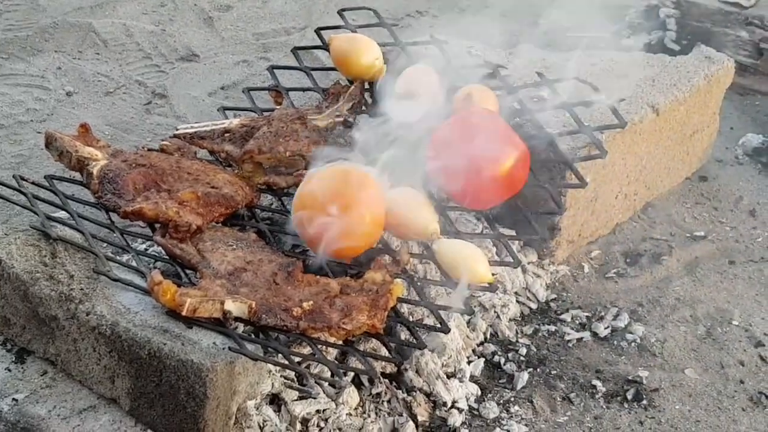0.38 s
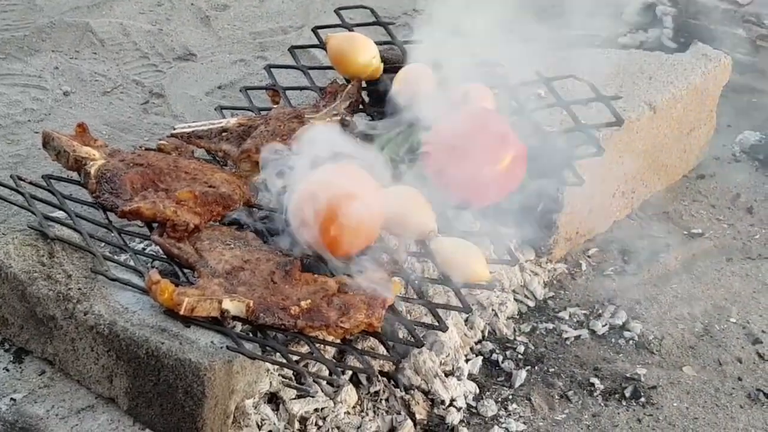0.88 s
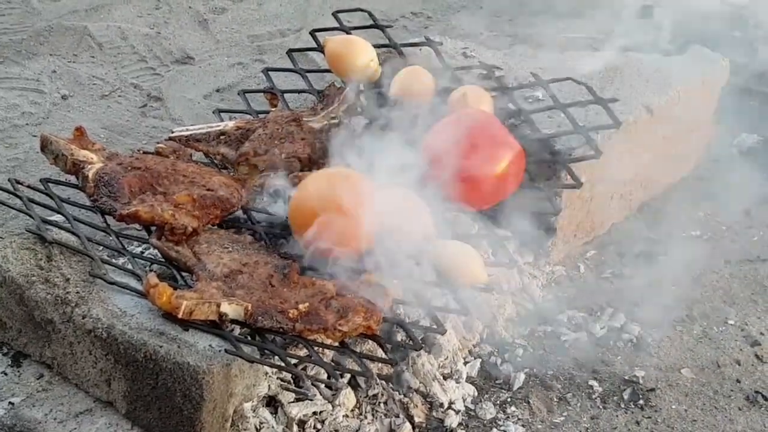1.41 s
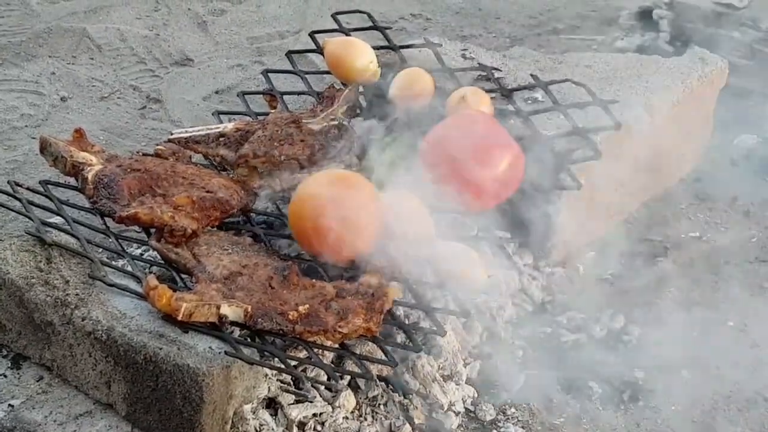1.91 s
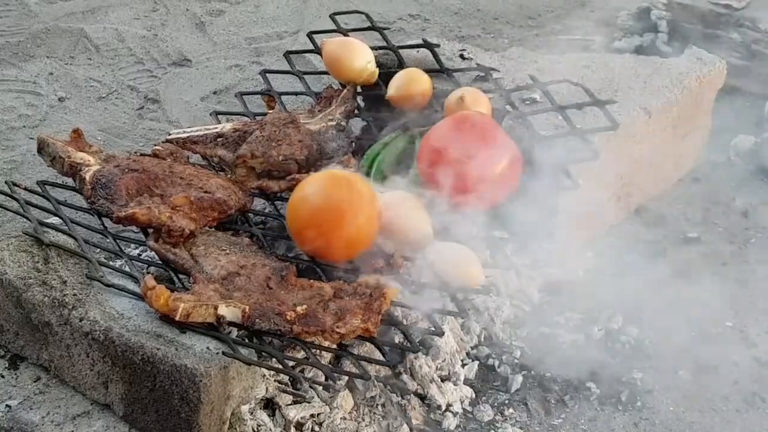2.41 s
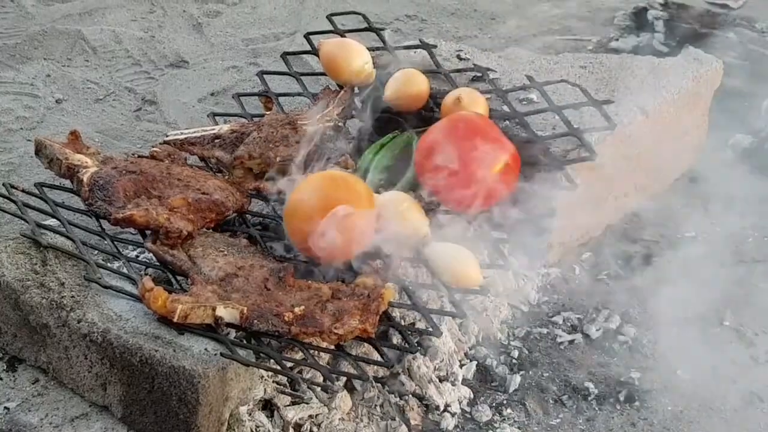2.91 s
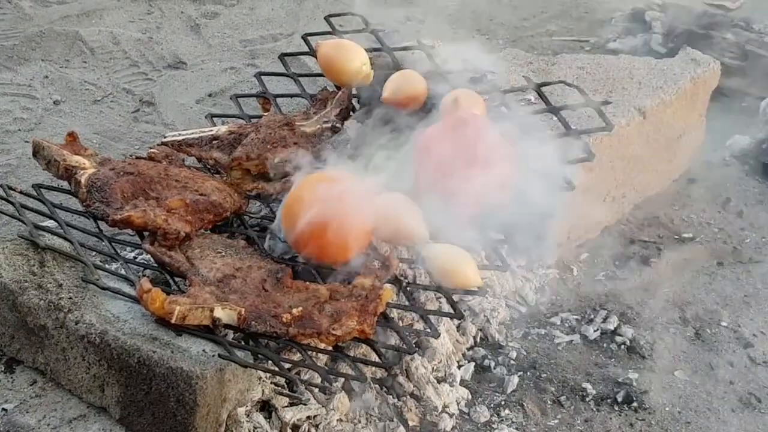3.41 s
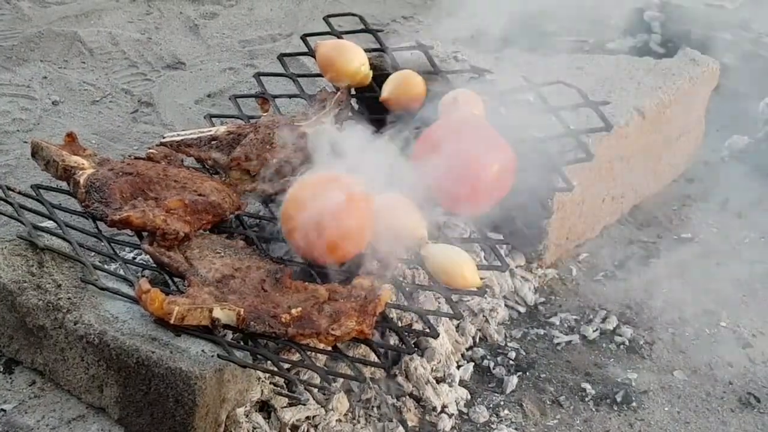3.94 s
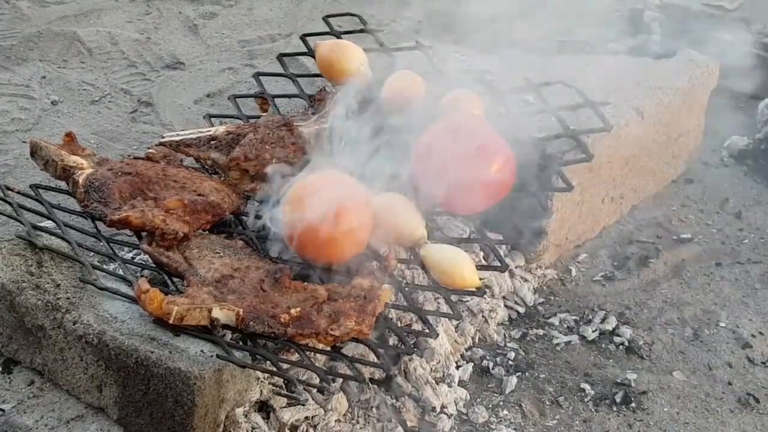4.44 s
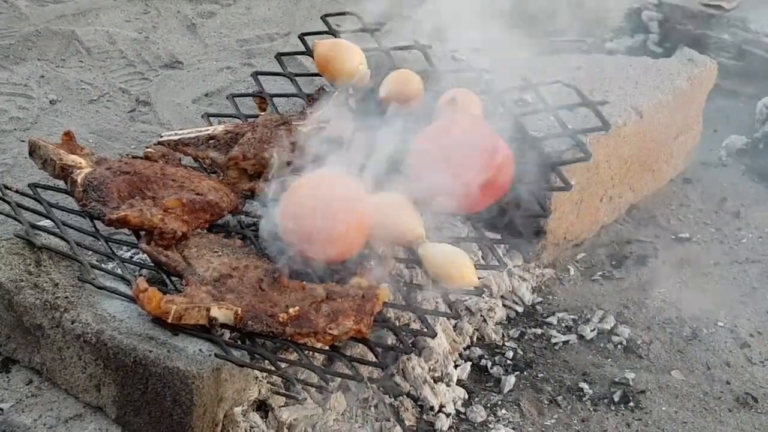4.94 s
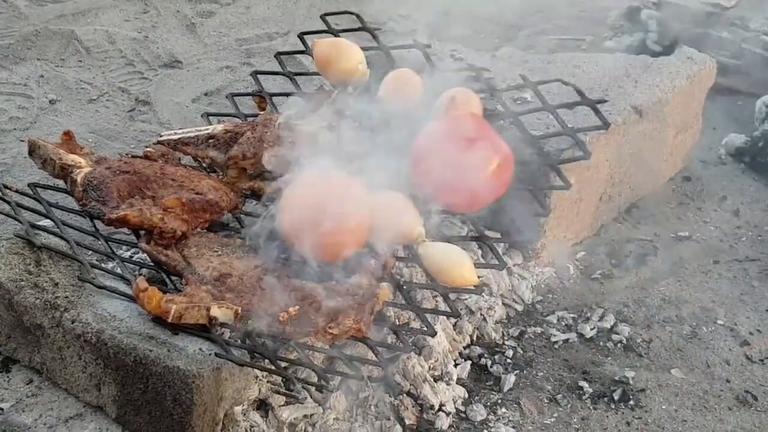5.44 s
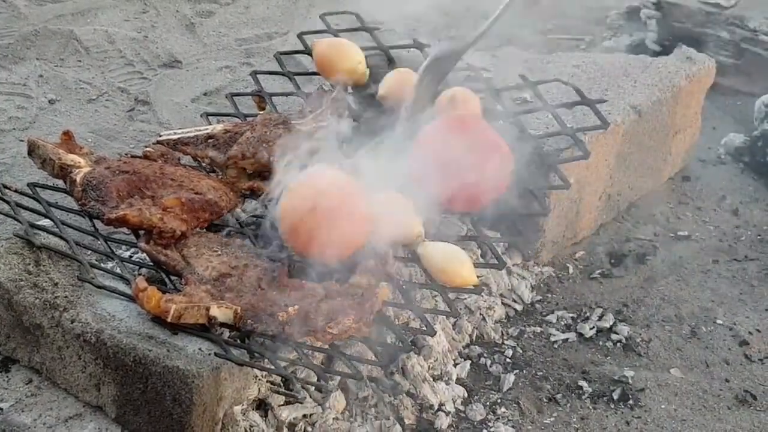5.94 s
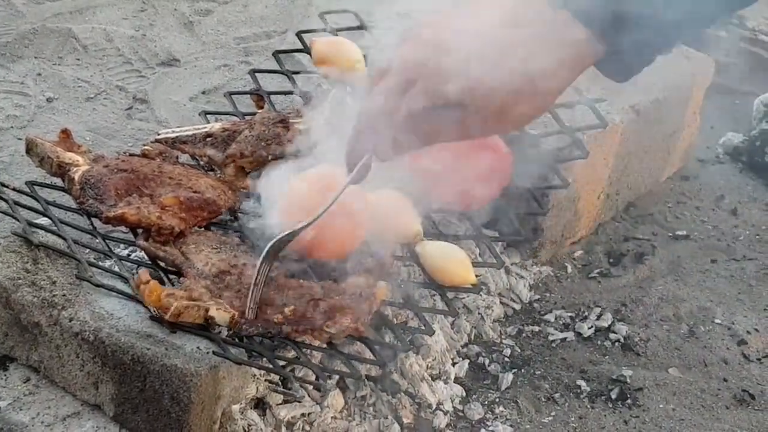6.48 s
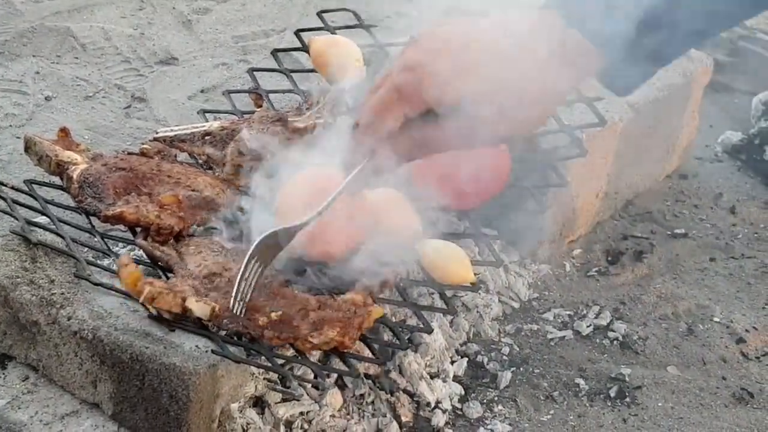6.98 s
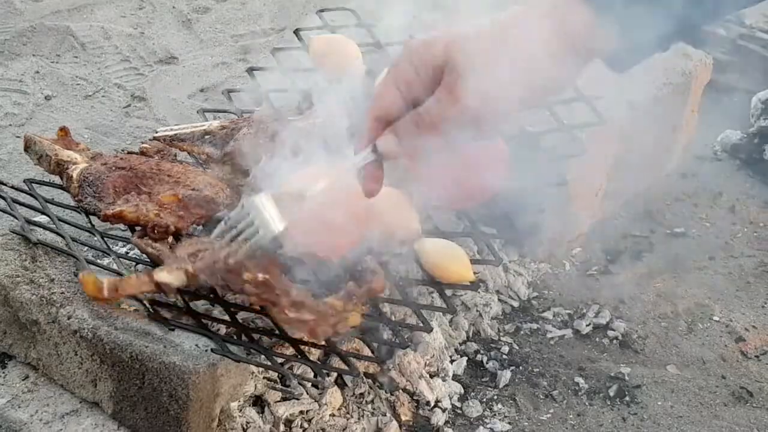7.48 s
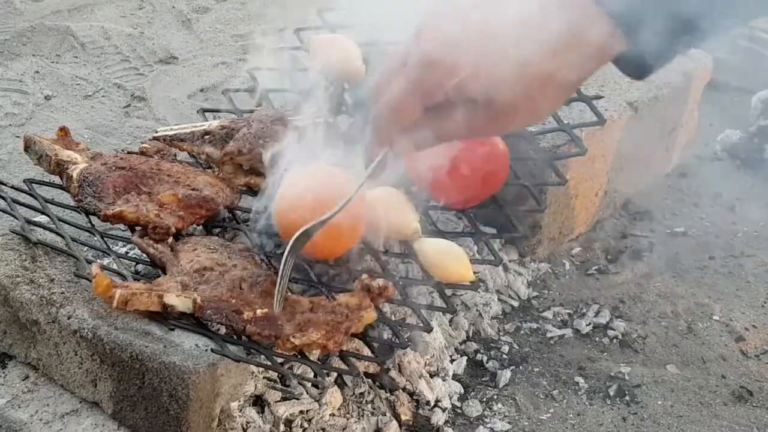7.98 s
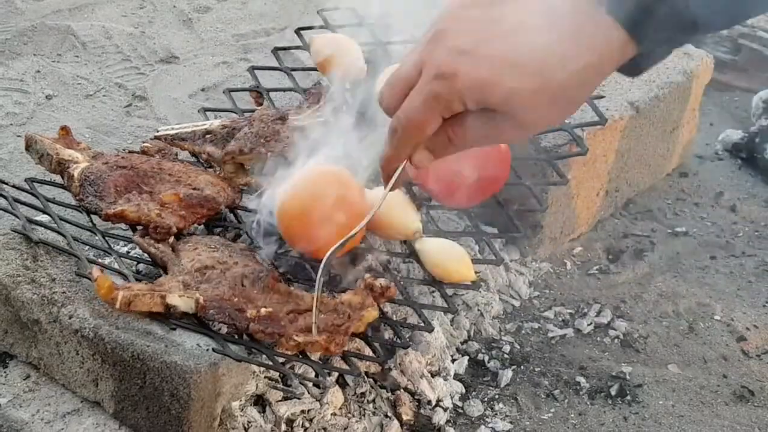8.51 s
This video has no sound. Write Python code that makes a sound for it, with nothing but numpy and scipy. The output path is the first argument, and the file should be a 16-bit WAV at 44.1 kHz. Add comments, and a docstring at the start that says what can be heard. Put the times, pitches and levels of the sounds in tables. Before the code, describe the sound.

Close outdoor stereo of meat sizzling on a wire grill, with fine hiss and sharp fat spits, strongest in the first three seconds. A soft knock comes near 2.6 seconds, then gritty scuffs from the right. Distant heavy engines pull and change gear over traffic rumble and light wind. The right side loses treble after three seconds, then becomes muffled under a finger.

```python
"""Meat sizzles and spits on a wire grill over coals: flickering grainy noise and short band-levelled snaps. A
hand-held two-port microphone is close by, outdoors; grains and damped modes make scuffs on grit and a knock. On
a distant road two heavy engines, built from unsteady tones, accelerate over layered traffic noise and wind.
After three seconds a finger comes over the right port: first a deep notch opens around 8 kHz, then a growing
muffling."""
import sys
import numpy as np
from scipy import signal
from scipy.fft import rfft, irfft, next_fast_len
from scipy.io import wavfile
from scipy.ndimage import uniform_filter1d, map_coordinates

SR = 44100
rng = np.random.default_rng(int(sys.argv[2]) if len(sys.argv) > 2 else 0)


def attenuation_scalar(level_db):
    """Turn a level in dB into a linear amplitude multiplier (20 dB per decade)."""
    decades = np.asarray(level_db, float) / 20
    return 10 ** decades


def file_out(sig):
    """Save sig as 16-bit WAV at sys.argv[1]."""
    # one column per channel
    cols = np.atleast_2d(sig).T
    # limit, then scale
    lim = np.clip(cols, -1, 1)
    pcm = np.round(lim * 32767).astype(np.int16)
    wavfile.write(sys.argv[1], SR, pcm)


N = 380141  # samples

# swell of the sizzle: time_s, level_db
SIZZLE_SWELL = [(0, -56), (1, -57), (2.2, -58), (2.5, -54.5), (2.9, -55.5), (3.2, -58.5), (3.6, -59),
                (4.3, -62), (6, -62), (8.62, -63.5)]
# colour of the sizzle at each port, combed by the stones: freq_hz, left_db, right_db
FAT_COLOUR = [(1500, -16, -35), (2640, -10.5, -15), (3735, 3.5, 4.5), (4380, 2.5, -3), (5440, -4.5, 0),
              (7330, 3.5, 4), (8800, 0, -0.5), (9500, 3, -10), (11000, 3.5, 5), (12700, 2, 2),
              (15500, -3, 2)]
# left-right likeness of the sizzle: freq_hz, likeness (0 to 1)
FAT_LIKENESS = [(3000, 0.44), (4000, 0.47), (7000, 0.41), (9000, 0.04), (14000, 0.026)]
# colour of the steady fine hiss: freq_hz, level_db
HISS_COLOUR = [(1200, -34), (2200, -22), (3500, -23), (4600, 3), (9000, 2.5), (10000, 0), (14000, 4)]
# the loudest spits: start_s, middle_db, top_db, body_db, left_over_right_db
LOUD_SPITS = [(0.0597, -41.5, -44, -56, -1), (0.5867, -46, -50, -65, -4), (0.9676, -44.5, -46.5, -66, 2),
              (1.1506, -50, -47, -63, -1), (1.179, -55, -49, -71, -2), (1.4317, -64, -47.5, -60, -8),
              (1.6813, -46, -46, -72, -1), (1.7183, -49, -47, -53.5, -3), (1.8842, -62, -51, -71, -3),
              (1.9252, -51, -46, -65, -2), (2.103, -57, -54, -76, -5), (2.1325, -60, -51, -76, -9),
              (2.3259, -60, -46.5, -72, -7), (2.4228, -42, -36.5, -65, 3), (2.4663, -52, -64, -74, 1),
              (2.4876, -62, -47, -71, -3), (2.5392, -59, -46, -68, 2), (2.638, -46.5, -46, -55, -6),
              (2.683, -47.5, -55, -55, -3), (2.992, -49, -47, -75, -3), (3.0983, -43.5, -43, -68, -18),
              (3.2122, -41.5, -42, -50, -20), (3.3917, -48, -59, -61, -5), (3.4441, -47, -46, -64, 4),
              (3.512, -50, -48, -71, -2), (3.654, -71, -68, -50.5, 6), (3.8271, -73, -68, -54.5, -2),
              (3.9046, -50.5, -63, -67, 0), (4.1698, -71, -52, -69, 0), (4.8485, -50, -50, -53, -2),
              (4.884, -56, -50, -74, 0), (5.295, -52, -69, -64, -3), (7.2874, -52, -50, -56.5, 4),
              (7.55, -48.5, -59, -52.5, 7), (7.8208, -49, -43, -69, 5), (8.5472, -62, -47, -80, 0)]
# scuffs on grit, rise and fall spanning 20 dB: peak_s, rise_s, fall_s, crunch_db, hollow_db, bright_db
SCUFF_SWELLS = [(1.925, 0.037, .15, -60.5, -58, -65), (3.259, 0.0045, 0.046, -62, -42, -61),
                (3.281, 0.023, 0.034, -46, -42.5, -47.5), (3.305, .03, 0.2, -54.5, -68, -57),
                (3.946, 0.094, 0.054, -57, -65, -62), (4.045, 0.076, 0.14, -51, -62, -51),
                (4.516, 0.025, 0.017, -52, -54, -59), (4.545, 0.015, 0.079, -52, -51.5, -65),
                (4.7, 0.18, 0.11, -58.5, -69, -78), (5.4327, 0.0047, 0.0062, -40.5, -52, -68),
                (5.476, 0.14, 0.2, -53.5, -64, -65.5), (5.77, 0.019, 0.042, -55, -64, -76)]
# colour of coarse grit: freq_hz, level_db
COARSE_GRIT = [(800, -25), (1300, 5.5), (2000, -0.5), (2700, -8.5), (3600, -22)]
# colour of fine grit: freq_hz, level_db
FINE_GRIT = [(2000, -14), (2900, -10), (4500, -12), (6500, -30), (9000, -31)]
# hollow resonances of the sole: freq_hz, width_hz, level_db
SOLE_MODES = [(428, 210, -17), (677, 120, 4.5), (1020, 150, 0), (1320.5, 520, -9)]
# modes of the knocked solid thing: freq_hz, level_db, t60_s
KNOCK_MODES = [(277, 3.5, 0.042), (338, -2.5, .04), (535, -6, 0.032), (750, -7.5, 0.034),
               (976, -1.5, 0.026), (1470, -17, 0.023), (2110, -29, .02)]
# nearer engine, pulling, lifting off, pulling in the next gear: time_s, firing_hz, fundamental_db, second_db
NEAR_ENGINE = [(0, 73.15, -43, -47.5), (0.35, 72.9, -40, -46), (1.03, 73.3, -43, -47),
               (1.86, 74.67, -40, -47), (2.32, 74.5, -42, -45.5), (2.67, 74.8, -43, -51.5),
               (3.06, 75.17, -43, -48), (3.78, 74.74, -38.5, -47.5), (4.3, 76.03, -40, -45.5),
               (4.55, 77.2, -34, -45), (4.9, 76.4, -36, -43), (5.12, 77.47, -32.5, -41.5),
               (6.23, 80.1, -36.5, -43), (6.45, 79.45, -36, -41.5), (7.11, 80.5, -38, -40.5),
               (7.56, 80.35, -41, -47.5), (7.76, 78, -47.5, -64), (7.95, 76.7, -53, -70),
               (8.15, 69, -52, -66), (8.3, 64, -61, -55), (8.38, 64.9, -38.5, -70), (8.48, 67.2, -45, -73),
               (8.62, 69.3, -38, -48)]
# farther engine through two gears: time_s, firing_hz, level_db, gear_whine_db
FAR_ENGINE = [(0, 42.8, -68, -85), (1.15, 45.23, -53, -66), (2, 50.12, -61, -65.5), (2.8, 55.02, -54, -57),
              (3.6, 58.5, -56, -64), (4.2, 60.36, -66, -63), (4.45, 58.1, -64, -88), (4.8, 48.98, -53, -90),
              (5.5, 48.64, -45, -90), (6.2, 50.1, -44.5, -78), (6.9, 52.45, -48, -67),
              (7.4, 55.16, -45, -68.5), (7.8, 56.96, -44.5, -68.5), (8.2, 59.4, -47.5, -79),
              (8.62, 61.52, -58, -66)]
# faint tone from the road: time_s, pitch_hz, level_db
FAINT_TONE = [(4.2, 622, -95), (4.4, 628, -68.5), (4.9, 632, -67), (5.35, 634, -72), (5.6, 634, -95)]
# swell of the traffic: time_s, roar_db, tyre_hiss_db
ROAD_SWELL = [(0, -57.5, -58), (0.6, -58, -58.5), (2.2, -61, -64), (3.3, -57, -60.5), (3.7, -59.5, -62.5),
              (4.8, -59, -60), (5.6, -58.5, -60), (6.5, -60.5, -69.5), (7.1, -63, -71), (8.1, -69, -84),
              (8.62, -68.5, -72)]
# swell of the airy band from the road: time_s, level_db
AIRY_LEVEL = [(4.6, -83), (5.4, -60), (6.1, -66), (6.8, -72), (7.4, -81), (8.62, -87)]
# colours of road rumble, roar, tyres and airy band: freq_hz, level_db
RUMBLE_COLOUR = [(30, -16), (50, -1), (65, 4.5), (110, 6), (180, -2), (260, -11), (340, -31)]
ROAR_COLOUR = [(150, -13), (250, 2), (330, 0.5), (420, -5.5), (600, -3), (800, -22.5), (1100, -31)]
TYRE_COLOUR = [(450, -10), (750, 0.5), (1050, -0.5), (1400, -3.5), (1800, -15.5), (2600, -16.5),
               (4000, -53), (7000, -56)]
AIRY_COLOUR = [(700, -30), (1000, -2), (1300, 1.5), (1600, -7), (2000, -29)]
# left-right likeness of the road: freq_hz, likeness (0 to 1)
ROAD_LIKENESS = [(60, 0.99), (250, 0.93), (600, 0.64), (1200, 0.41), (2500, 0.097)]
# colour of the wind buffeting: freq_hz, level_db
WIND_COLOUR = [(15, -31), (28, -1), (40, 13), (60, 5.5), (100, 3), (160, -39)]
# right port's loss under the finger at full cover, and at the notch's full depth: freq_hz, muffling_db,
# notch_db
RIGHT_PORT_LOSS = [(70, 0, 0), (160, -1, 0), (500, -3, 0), (1500, -5, 0), (2600, -9, 0), (4100, -17, 0),
                   (5700, -17, -3), (6700, -17, -10), (7300, -15, -18), (7900, -14, -32), (8800, -12, -34),
                   (9400, -11, -17), (10300, -10, -6), (11000, -9, -2), (14500, -8, 0)]

SMALL_SPIT_DB, SMALL_SPREAD_DB = [-3, 0.5, -13], 8.5  # middle, top, body over the sizzle; scatter each way
KNOCK_S, KNOCK_DB = 2.615, -28.5
RUMBLE_DB, WIND_DB, GUST_DB, GUSTS_PER_S = -49, -57.5, 1, 2.5
NOTCH_S, NOTCH_TAKES_S = 3.12, 0.38  # the finger's notch around 8 kHz begins
COVER_S, COVER_TAKES_S, COVER_AT_FIRST, FULL_S = 3.82, 0.58, 0.68, 6.0  # the muffling under the finger grows, then settles
TOP_HZ = 14650  # band limit of the treble


def unit(x):
    """Scaled to rms 1."""
    return x / np.sqrt(np.mean(x ** 2) + 1e-20)


def along(points, hz):
    """Table columns read at hz on a log frequency axis, one row per column."""
    f, *cols = np.transpose(points)
    return np.squeeze([np.interp(np.log(hz + 1), np.log(f + 1), c) for c in cols])


def curves(rows):
    """One value per sample for each column after the time."""
    s, *cols = np.transpose(rows)
    return np.array([np.interp(np.arange(N) / SR, s, c) for c in cols])


def wobble(rate):
    """A smooth random curve, rate knots a second."""
    knots = rng.standard_normal(int(N * rate / SR) + 4)
    return map_coordinates(knots, [np.arange(N) * rate / SR])


def filtered(x, response):
    """x shaped by a complex response of frequency."""
    m = next_fast_len(N + 8192)
    return irfft(rfft(x, m) * response(np.fft.rfftfreq(m, 1 / SR)), m)[..., :N]


def lead(hz, ms):
    """Left port earlier than the right by ms, half on each side."""
    return np.exp(1j * np.pi * hz * np.array([[ms], [-ms]]) / 1000)


def ports(pair, spectrum, alike, lead_ms):
    """Two unrelated signals mixed to a likeness between ports, coloured, rms 1."""
    def mid_side(hz):
        angle = np.arccos(np.clip(along(alike, hz), -1, 1)) / 2
        return np.array([np.cos(angle), np.sin(angle)])

    mid, side = filtered(pair, mid_side)
    left_right = np.array([mid + side, mid - side])
    return unit(filtered(left_right, lambda hz: attenuation_scalar(along(spectrum, hz)) * lead(hz, lead_ms)))


def patchy(patchy_db):
    """Two noises whose gain drifts together in patches of time and frequency."""
    z = signal.stft(rng.standard_normal((2, N)), nperseg=512)[2]
    field = uniform_filter1d(rng.standard_normal(z.shape[1:]), size=8, axis=0)
    field = uniform_filter1d(field, size=10, axis=1)
    return signal.istft(z * attenuation_scalar(patchy_db * unit(field)), nperseg=512)[1][:, :N]


def grains(per_s, spread_db, life_ms):
    """Two noises gated by the same random bursts of exponentially spread, bounded size."""
    sizes = attenuation_scalar(spread_db * np.minimum(rng.exponential(size=N), 2.5))
    starts = (rng.random(N) < per_s / SR) * sizes
    t_ms = np.arange(512) * 1000 / SR
    gate = signal.fftconvolve(starts, np.exp(-t_ms / life_ms))[:N]
    return unit(gate * rng.standard_normal((2, N)))


def sizzle():
    """Dense bursting bubbles of fat in uneven flurries, sparser sharp ticks, and a steady fine hiss."""
    bubbles = 0.56 * patchy(patchy_db=2.5) + 0.52 * grains(per_s=600, spread_db=4, life_ms=0.22)
    ticks = 0.3 * grains(per_s=110, spread_db=3, life_ms=0.2)
    flurries = attenuation_scalar(curves(SIZZLE_SWELL) + 0.9 * wobble(12) + 1.7 * wobble(30))
    faint_ticks = 0.1 * grains(per_s=25, spread_db=3, life_ms=0.25)
    hiss = ports(patchy(patchy_db=2.5) + faint_ticks, HISS_COLOUR, [(3000, 0)], lead_ms=0)
    hiss_level = attenuation_scalar(-60 + 0.29 * wobble(13))
    return flurries * ports(bubbles + ticks, FAT_COLOUR, FAT_LIKENESS, lead_ms=0) + hiss_level * hiss


def spits():
    """Each spit is a sub-millisecond snap with a short hissing trail, levelled in three bands."""
    t = np.arange(600) / SR
    out = np.zeros((2, N + len(t)))
    bands_hz = [3200, 9000], [9000, 15800], [1200, 3200]  # middle, top, body
    bands = [signal.butter(2, hz, "band", fs=SR, output="sos") for hz in bands_hz]
    decay = attenuation_scalar(-60 * t / 0.003) + 0.09 * attenuation_scalar(-60 * t / 0.025)  # snap, then trail
    for start_s, *band_db, pan_db in [*LOUD_SPITS, *small_spits(count=30)]:
        noise = rng.standard_normal((3, len(t)))
        noise[0, 0] = 5  # one broad impulse, for an even, sharp click
        snap = (noise[0] + 0.7 * noise[1:]) * decay  # shared noise plus one of its own per port
        pan = np.sqrt(1 + np.tanh(np.log(attenuation_scalar(pan_db))) * np.array([[1], [-1]]))
        begin = round(start_s * SR)
        for sos, db in zip(bands, band_db):
            part = signal.sosfilt(sos, snap)
            # the level is the rms of the first two milliseconds
            part *= attenuation_scalar(db) / np.sqrt(np.mean(part[:, :SR // 500] ** 2, axis=1, keepdims=True))
            out[:, begin:begin + len(t)] += part * pan
    return out[:, :N]


def small_spits(count):
    """Rows like LOUD_SPITS at random moments, denser and stronger where the sizzle is strong."""
    level_db = curves(SIZZLE_SWELL)[0]
    share = np.cumsum(attenuation_scalar(2 * level_db))
    draw = rng.random((count, 5))
    at = np.searchsorted(share, draw[:, 0] * share[-1])
    scatter_db = SMALL_SPREAD_DB * (2 * draw[:, 1:] - 1)
    band_db = level_db[at, None] + SMALL_SPIT_DB + scatter_db[:, :3]
    return np.column_stack([at / SR, band_db, scatter_db[:, 3]])


def scuffs():
    """Grit crunches in dense grains under a sliding sole, which adds its own hollow tone; from the right."""
    t = np.arange(N) / SR
    swells = np.zeros((3, N))
    for peak_s, rise_s, fall_s, *peak_db in SCUFF_SWELLS:
        away = np.where(t < peak_s, (peak_s - t) / rise_s, (t - peak_s) / fall_s)
        swells += attenuation_scalar(np.c_[peak_db] - 20 * away)
    crunch, hollow, bright = swells
    bits = grains(per_s=2500, spread_db=1.5, life_ms=1)
    grit = crunch * ports(bits, COARSE_GRIT, [(2000, 0.86)], lead_ms=-0.4)
    grit += bright * ports(bits, FINE_GRIT, [(4000, 0.28)], lead_ms=-0.31)

    def resonance(f):
        modes = 0
        for k, (centre, width, db) in enumerate(SOLE_MODES):  # neighbours in opposite polarity
            modes = modes + (-1) ** k * attenuation_scalar(db) * 1j * f * width / (centre ** 2 - f ** 2 + 1j * f * width)
        return modes * lead(f, ms=-0.31)

    rubbing = grains(per_s=900, spread_db=1, life_ms=1.6)[0]
    return grit + hollow * unit(filtered(rubbing, resonance))


def knocks():
    """A soft blow on something solid, from the right: a few modes that die fast."""
    t = np.clip(np.arange(N) / SR - KNOCK_S, 0, None)
    ring = sum(attenuation_scalar(db - 60 * t / t60) * np.sin(2 * np.pi * hz * t) for hz, db, t60 in KNOCK_MODES)
    soft_onset = 1 - np.exp(-t / 0.00093)
    return filtered(-attenuation_scalar(KNOCK_DB) * ring * soft_onset, lambda f: lead(f, ms=-0.27))


def engines():
    """Low firing orders as slightly unsteady tones, arriving from the left."""
    hz, first_db, second_db = curves(NEAR_ENGINE)
    phase = 2 * np.pi * np.cumsum(hz) / SR + 0.19 * wobble(8.1)
    near = attenuation_scalar(first_db + 1.24 * wobble(7)) * np.sin(phase)
    near += attenuation_scalar(second_db + 0.92 * wobble(7.3)) * np.sin(2 * phase + 0.7)

    hz, db, whine_db = curves(FAR_ENGINE)
    phase = 2 * np.pi * np.cumsum(hz) / SR + 0.071 * wobble(5.4)
    second = attenuation_scalar(-7 + 1.7 * wobble(4)) * np.sin(2 * phase)
    far = attenuation_scalar(db + 0.72 * wobble(6.2)) * (np.sin(phase) + second)
    whine = 5 * phase + 0.7 * wobble(14)  # gear whine at five times the firing rate
    far += attenuation_scalar(whine_db + 2.1 * wobble(8)) * (np.sin(whine) + attenuation_scalar(-8.5) * np.sin(2 * whine))

    hz, db = curves(FAINT_TONE)
    tone_phase = 2 * np.pi * np.cumsum(hz) / SR + 0.5 * wobble(8.9)
    far += attenuation_scalar(db + 1.7 * wobble(6.5)) * np.sin(tone_phase)

    near = filtered(near, lambda f: lead(f, ms=0.54) * attenuation_scalar([[0.3], [-0.3]]))
    far = filtered(far, lambda f: lead(f, ms=0.38))
    return np.sqrt(2) * (near + far)  # a sine's level is its rms


def road():
    """Traffic noise in layers, smooth with distance, and a light gusty wind that differs from port to port."""
    roar_db, tyre_db = curves(ROAD_SWELL)
    rumble_noise = rng.standard_normal((2, N))
    rumble = attenuation_scalar(RUMBLE_DB) * ports(rumble_noise, RUMBLE_COLOUR, ROAD_LIKENESS, lead_ms=0.316)
    roar = attenuation_scalar(roar_db) * ports(patchy(patchy_db=2.05), ROAR_COLOUR, ROAD_LIKENESS, lead_ms=0.28)
    tyres = attenuation_scalar(tyre_db) * ports(patchy(patchy_db=1.5), TYRE_COLOUR, ROAD_LIKENESS, lead_ms=0.38)
    airy = ports(patchy(patchy_db=2), AIRY_COLOUR, ROAD_LIKENESS, lead_ms=0.28)
    airy = attenuation_scalar(curves(AIRY_LEVEL)) * airy
    gusts = attenuation_scalar(WIND_DB + GUST_DB * wobble(GUSTS_PER_S))
    wind = gusts * ports(rng.standard_normal((2, N)), WIND_COLOUR, [(40, 0.24)], lead_ms=0)
    return rumble + roar + tyres + airy + wind


def scene():
    """Everything that reaches the two ports."""
    return sizzle() + spits() + scuffs() + knocks() + engines() + road()


def top_cut(x):
    """Nothing passes above the cut-off."""
    return signal.sosfilt(signal.butter(12, 15880, fs=SR, output="sos"), x)


def record(dry):
    """Under the finger the right port first loses a notch around 8 kHz, then is muffled; both drop 36 dB above
    the band limit."""
    hz, t, z = signal.stft(dry[1], SR, nperseg=512)
    cover = np.interp(t, [COVER_S, COVER_S + COVER_TAKES_S, FULL_S], [0, COVER_AT_FIRST, 1])
    notch = 1 - np.exp(-3 * np.clip(t - NOTCH_S, 0, None) / NOTCH_TAKES_S)
    loss_db = along(RIGHT_PORT_LOSS, hz).T @ [cover, notch]
    right = signal.istft(z * attenuation_scalar(loss_db), SR, nperseg=512)[1][:N]
    both = np.array([dry[0], right])
    limited = filtered(both, lambda f: np.where(f < TOP_HZ, 1, attenuation_scalar(-36)))
    return top_cut(limited)


dry = scene()
out = record(dry)
file_out(out)
```